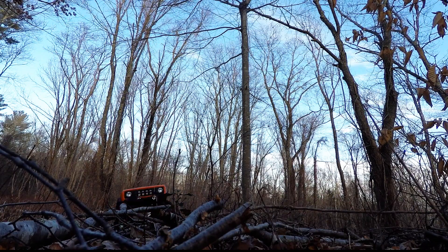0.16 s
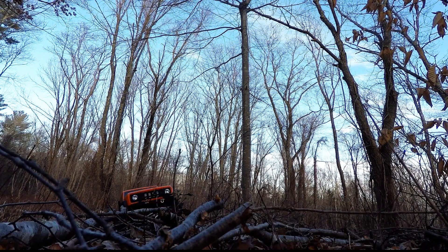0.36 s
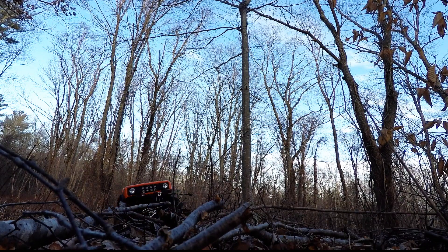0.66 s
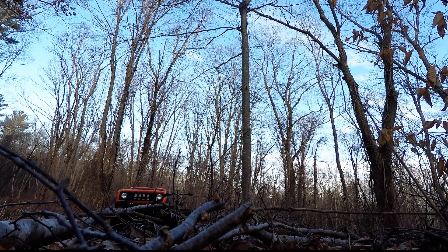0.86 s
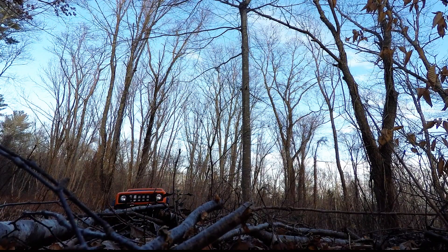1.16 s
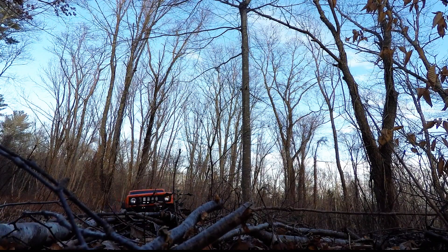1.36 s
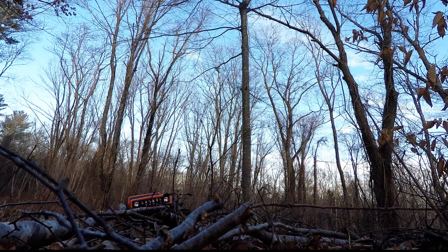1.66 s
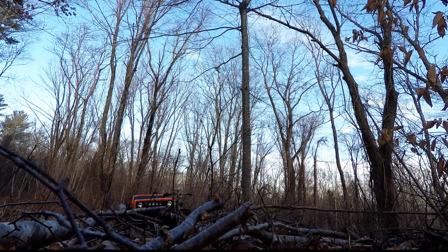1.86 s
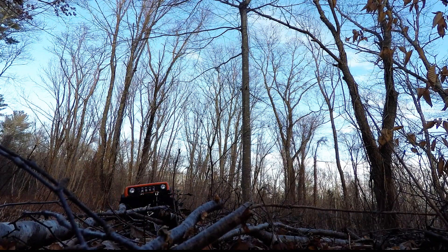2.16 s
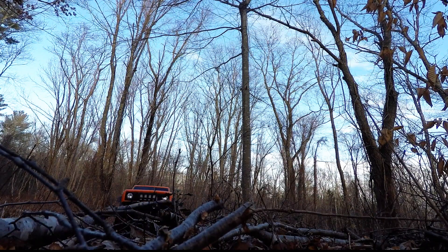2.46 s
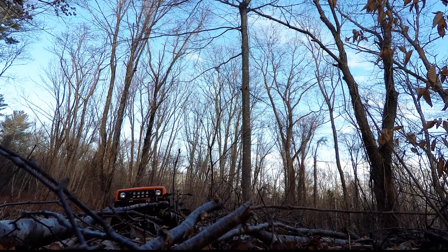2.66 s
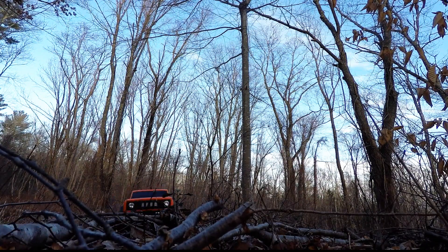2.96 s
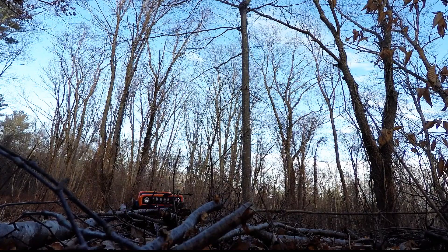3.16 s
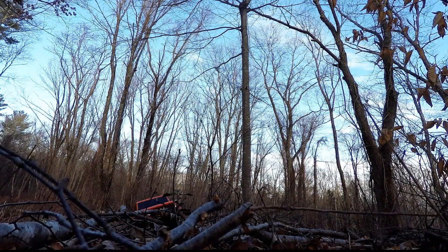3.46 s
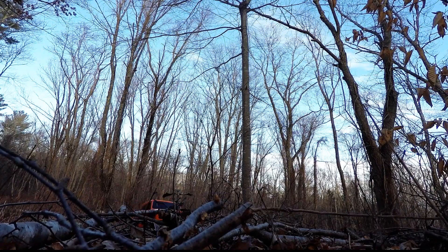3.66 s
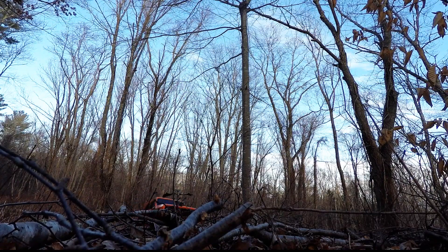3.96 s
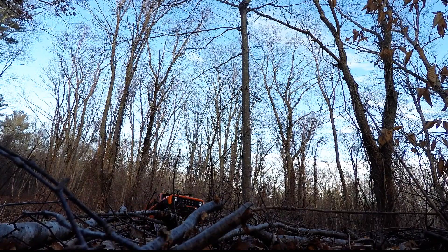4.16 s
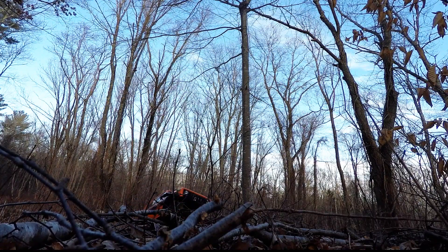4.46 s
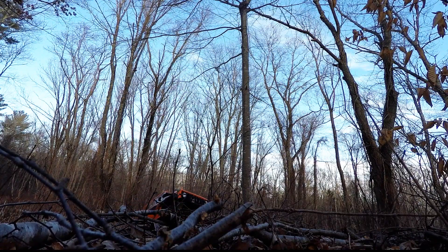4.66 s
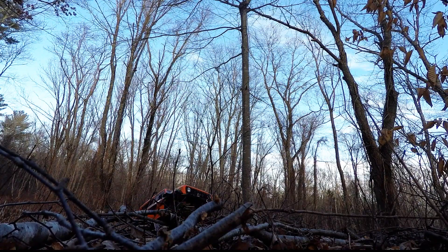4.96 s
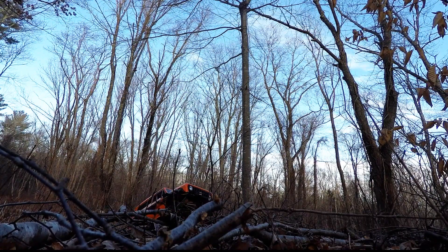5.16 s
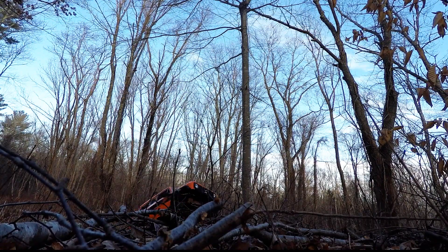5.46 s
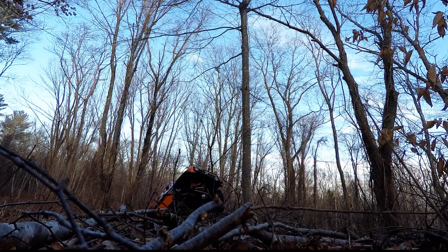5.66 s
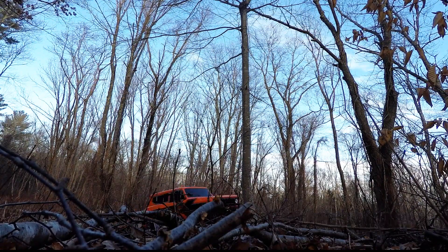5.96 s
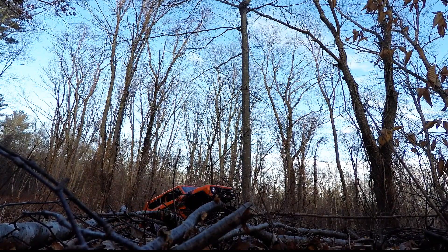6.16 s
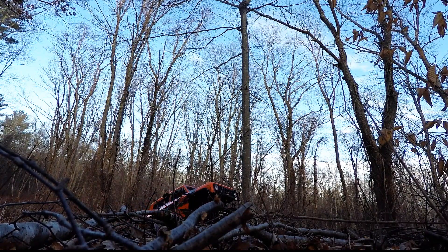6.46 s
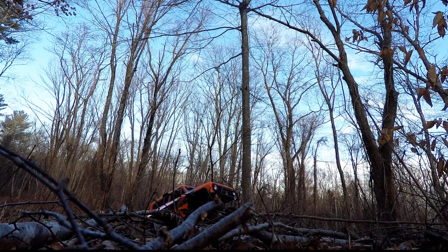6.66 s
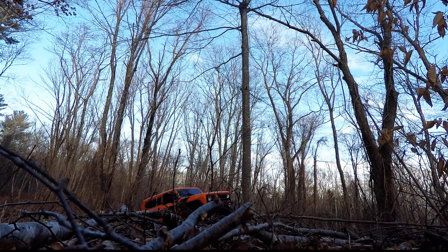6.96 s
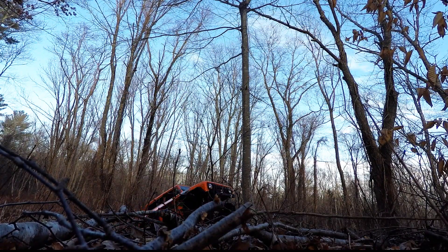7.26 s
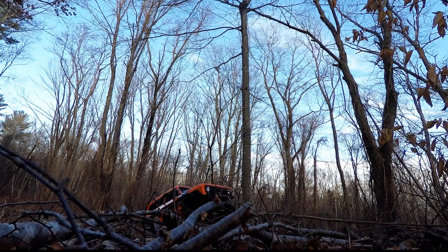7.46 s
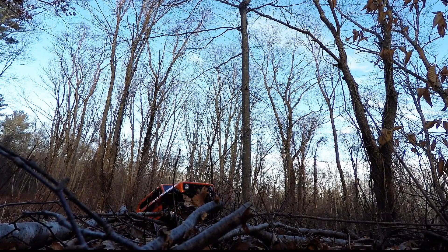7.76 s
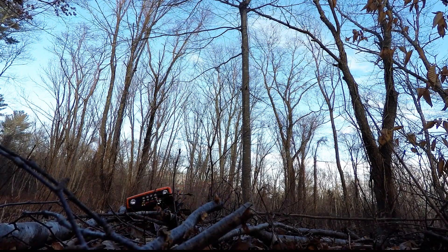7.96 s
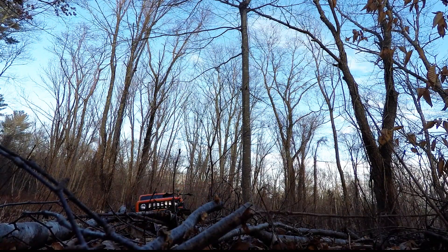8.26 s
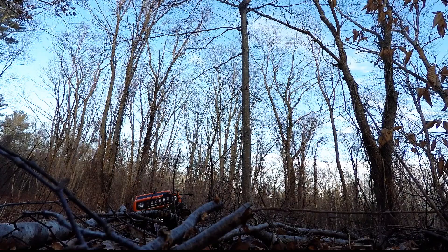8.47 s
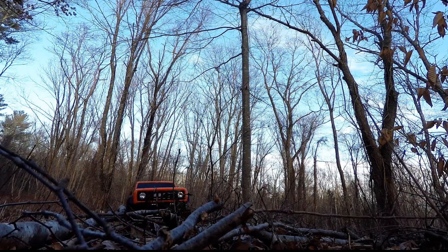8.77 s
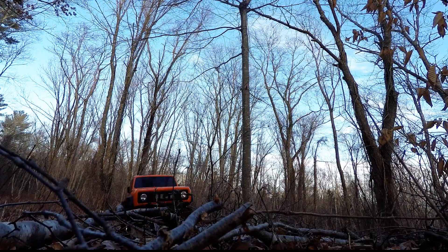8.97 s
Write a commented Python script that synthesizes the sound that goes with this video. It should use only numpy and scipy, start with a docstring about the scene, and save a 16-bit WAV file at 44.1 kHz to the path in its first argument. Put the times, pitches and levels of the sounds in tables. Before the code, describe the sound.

Stop-start whirring and gritty gear clatter come from a radio-controlled toy truck working across a woodland branch pile. Sticks knock, dry leaves crackle and twigs crack, most sharply about three seconds in. A longer straining whine follows, then further brief pulls with hollow bumps as the wheels drop, ending in a leafy crunch and snap. The sound is fairly close, with very little echo and faint low outdoor air.

```python
"""A small radio-controlled truck crawls over dead branches and dry leaves in a wood.
It sets off in short throttle pulls: gears whine and rasp, the chassis rumbles, tyres scrub bark and
crush leaves, the steering servo buzzes. Twigs snap and sticks knock, loudest near 3 s. From 3.8 s the
motor labours through a long climb; short pulls follow, with a hard double bump at 7.7 s. A last climb
ends at 9 s in crushed leaves, a bump and a snap. Outdoor air rumbles faintly throughout."""
import sys
import numpy as np
from scipy import signal
from scipy.fft import rfft, irfft, next_fast_len
from scipy.io import wavfile
from scipy.ndimage import uniform_filter1d, map_coordinates

SR = 44100
rng = np.random.default_rng(int(sys.argv[2]) if len(sys.argv) > 2 else 0)


def inscribe(sig):
    """Save sig as 16-bit PCM at rate SR to the path in sys.argv[1].

    A 1-D sig is mono; a 2-D sig holds one channel per row.
    Samples are clipped to [-1, 1] before scaling.
    """
    pcm = np.round(np.clip(np.atleast_2d(sig).T, -1, 1) * 32767)
    wavfile.write(sys.argv[1], SR, pcm.astype(np.int16))


N = 401310
TIME_S = np.arange(N) / SR

# Throttle pulls: (start [s], stop [s], rasp [dB], rasp change [dB], whine [dB], full-speed mesh [Hz],
# shake [dB], scrub [dB], shake and scrub change [dB], crackle [dB], crackle change [dB])
THROTTLE_PULLS = [(-.06, 0.285, -50.5, 21, -58, 1854, -40, -52.5, -8, -62, -4),
                  (0.586, 0.902, -41.5, -12, -60, 2396, -37, -44.5, -0.5, -54, 9),
                  (1.209, 1.495, -41.5, 2, -52, 2327, -34, -40.5, 5.5, -55.5, -3),
                  (1.90, 2.39, -45.5, 10, -73, 2200, -43, -58, 8, -67.5, 22),
                  (2.346, 2.691, -46.5, 5, -70, 2308, -38.5, -46.5, -1.5, -52, 3.5),
                  (2.859, 3.377, -38.5, 1, -57, 2214, -32.5, -44, 2.5, -55.5, -9.5),
                  (3.827, 4.613, -47.5, 12, -58, 1792, -42.5, -58.5, 6.5, -64.5, -2),
                  (4.529, 5.64, -40, 3, -49.5, 2303, -38, -59.5, 7.5, -63, -1),
                  (5.571, 5.899, -36.5, 2, -49, 2300, -38, -51.5, 7.5, -56, -3),
                  (6.134, 6.531, -38.5, -3, -67, 2292, -35, -48.5, 1.5, -59, -6),
                  (6.79, 7.045, -41.5, 2, -61, 2195, -36, -44, 9, -63.5, 7),
                  (7.105, 7.478, -35.5, 1, -56, 2195, -31.5, -43, 3, -53.5, 2),
                  (7.555, 7.924, -36, -2.5, -52, 2387, -29.5, -40.5, 0, -55, 3),
                  (8.398, 8.764, -44, -2.5, -57, 2400, -39.5, -51.5, 5, -62, 16),
                  (8.732, 9.10, -47, 3, -60, 2294, -44.5, -55, 16, -66, 34)]
# Whine pitch curves, a brief servo-like arch near 1.85 s, then the climbs: (time [s], tooth mesh [Hz])
PITCH_CURVES = [
    [(1.8, 1384), (1.85, 1540), (1.89, 1380), (1.93, 688), (2.1, 1433), (2.2, 1903), (2.28, 1890),
     (2.35, 2210)],
    [(3.84, 1884), (3.95, 1668), (4.03, 1823), (4.3, 1674), (4.4, 2137), (4.47, 1657), (4.7, 2442),
     (4.85, 2568), (4.97, 2112), (5.09, 2428), (5.15, 2030), (5.28, 2574), (5.33, 2278), (5.38, 2265),
     (5.48, 1880), (5.53, 1870), (5.58, 2294), (5.67, 2390)],
    [(8.41, 1750), (8.51, 1850), (8.55, 2263), (8.65, 2503), (8.8, 1824), (8.95, 1860), (9.0, 2250)],
]


def gear_speed():
    """Tooth mesh in Hz: each pull spins the motor up; the pitch curves override it over their spans."""
    crawl_hz, spin_up_s = 1785.5, .08
    mesh_hz = np.zeros(N)
    for start, _, _, _, _, full_hz, *_ in THROTTLE_PULLS:
        on = TIME_S >= start
        spin_up = np.clip((TIME_S[on] - start) / spin_up_s, 0, 1) ** 2
        mesh_hz[on] = crawl_hz + (full_hz - crawl_hz) * spin_up
    for curve in PITCH_CURVES:
        times_s, curve_hz = np.transpose(curve)
        on = (TIME_S >= times_s[0]) & (TIME_S <= times_s[-1])
        mesh_hz[on] = np.interp(TIME_S[on], times_s, curve_hz)
    return mesh_hz


# Tooth-mesh harmonics: (multiple, level [dB], labouring boost [dB])
MESH_HARMONICS = [(1, -22, 19), (2, 10.5, -1.5), (3, -7, 7), (4, -16, 8)]
# Gear housing resonances: (centre [Hz], width [Hz], gain [dB])
HOUSING_MODES = [(1685, 71, -4), (2186, 71, 2), (2795, 280, -6), (3290, 67, 4), (3676, 110, 4.5),
                 (3984, 124, 0), (4392, 64, 8.5), (4730, 73, 8), (5140, 394, 2.5), (6010, 470, -1.5),
                 (6580, 312, -1), (7740, 304, -4.5), (10440, 1000, -17.5), (11460, 650, -11)]
# Short swells of whine: (centre time [s], length [s], level [dB])
WHINE_SWELLS = [(0.624, 0.046, -47), (0.697, .07, -44.5), (1.846, .07, -57.5), (2.11, .1, -53),
                (2.266, 0.14, -52), (2.948, .08, -50), (3.112, .07, -41), (4.04, .05, -57),
                (4.301, 0.078, -50), (4.462, 0.074, -46.5), (5.075, 0.049, -46), (5.151, 0.025, -50),
                (5.282, 0.045, -51), (5.494, 0.072, -43.5), (5.655, 0.034, -37), (6.177, 0.024, -52),
                (7.595, 0.041, -45), (8.48, 0.048, -52), (8.58, 0.08, -44.5)]


def gear_whine(mesh_hz):
    """Meshing teeth give a fluttering whine through the housing, with stronger sidebands when racing."""
    racing = np.clip((mesh_hz - 1850) / 550, 0, 1)
    flutter = 1 + .01 * wobble(70) + (.019 + .002 * racing) * wobble(900)
    phase = 2 * np.pi * np.cumsum(mesh_hz * flutter) / SR
    pinion_phase = phase / 11
    tone = np.zeros(N)
    for multiple, db, labour_db in MESH_HARMONICS:
        uneven_teeth = 1 + (.45 + .45 * racing) * np.sin(pinion_phase + 1.5 * wobble(40))  # sidebands
        harmonic_db = db + labour_db * (1.5 - racing) + 3.35 * wobble(110)
        tone += amp(harmonic_db) * uneven_teeth * np.sin(multiple * phase)
    tone = filtered(tone, lambda f: .5 + np.abs(resonances(HOUSING_MODES, f)))
    tone /= np.sqrt(np.abs(uniform_filter1d(tone ** 2, size=3000)) + 1e-12)  # running rms 1
    pulls = [(start, stop, db, change / 2) for start, stop, _, change, db, *_ in THROTTLE_PULLS]
    throttle = swells(pulls, attack_s=.045, arch_db=-.5, release_db_per_s=252, idle_db=-91)
    swell_power = sum(amp(db) ** 2 * np.exp(-np.minimum((2 * (TIME_S - s) / length_s) ** 2, 20))
                      for s, length_s, db in WHINE_SWELLS)
    load_db = 2.2 * wobble(45)
    return np.sqrt(throttle ** 2 + swell_power) * amp(load_db) * tone


# Tooth clatter spectrum: (frequency [Hz], gain [dB])
RASP_SPECTRUM = [(300, -40), (1200, 1.5), (1800, 0.5), (7800, -0.5), (8800, 19), (11000, -9), (15000, -12)]


def gear_rasp(mesh_hz):
    """Teeth clatter in the housing, harder once per turn of the spur gear."""
    spur_phase = 2 * np.pi * np.cumsum(mesh_hz / 38) / SR
    clatter = contacts(rate_hz=8300, spread_db=2.5) * amp(1.2 * np.sin(spur_phase) + 2.23 * wobble(130))
    rasp = filtered(clatter, lambda f: resonances(HOUSING_MODES, f) * amp(along(RASP_SPECTRUM, f)))
    pulls = [pull[:4] for pull in THROTTLE_PULLS]
    throttle = swells(pulls, attack_s=.052, arch_db=4, release_db_per_s=228, idle_db=-58.5)
    return amp(-5) * throttle * unit(rasp)


# Hollow body resonances: (centre [Hz], width [Hz], gain [dB])
CHASSIS_MODES = [(83.3, 23, -2), (161.6, 40, -3.5), (261, 123, -5), (359, 71, -1), (438.3, 61.6, 2),
                 (505, 110, -2), (770, 250, -12.5), (1134, 38, -13.5)]
# Body damping: (frequency [Hz], gain [dB])
CHASSIS_SPECTRUM = [(25, -23), (60, 2.5), (520, -0.5), (640, -6.5), (1150, -11), (1600, -39), (3000, -44),
                    (6000, -80)]
# Sliding and settling, throttle off: (start [s], stop [s], shake [dB], crackle [dB])
IDLE_SLIDES = [(0.313, 0.43, -38.5, -82), (1.593, 1.678, -43.5, -70), (2.768, 2.843, -46.5, -66),
               (3.484, 3.55, -39, -61.5), (5.919, 5.996, -36.5, -57.5), (7.958, 8.035, -41.5, -62),
               (8.132, 8.279, -45, -73)]


def chassis(mesh_hz):
    """Tyre lugs and the drive shaft shake the body, which also rattles briefly after each bump."""
    lugs = contacts(rate_hz=1600, spread_db=3) * amp(wobble(30))
    shaft = ticks(mesh_hz / 18 * (1 + .03 * wobble(60))) * amp(-14 + 6.1 * wobble(5))
    body = filtered(lugs + shaft, lambda f: resonances(CHASSIS_MODES, f) * amp(along(CHASSIS_SPECTRUM, f)))
    pulls = [(start, stop, db, change) for start, stop, *_, db, _, change, _, _ in THROTTLE_PULLS]
    slides = [(start, stop, db, 0) for start, stop, db, _ in IDLE_SLIDES]
    jolts = [(s, s + .046, db - 16, 0) for s, db, _ in WHEEL_DROPS]
    shake = swells(pulls + slides, attack_s=.069, arch_db=2, release_db_per_s=114, idle_db=-60.5)
    rattle = swells(jolts, attack_s=.0043, arch_db=0, release_db_per_s=260, idle_db=-120)
    return np.hypot(shake, rattle) * unit(body)


# Wheels landing on branches: (time [s], level [dB], favoured ring [Hz])
WHEEL_DROPS = [(0.412, -27, 293), (.565, -30, 120), (0.766, -19.5, 165), (0.823, -18.5, 130),
               (1.304, -22, 425), (1.42, -26.5, 434), (1.49, -17.5, 430), (1.926, -31, 380),
               (2.384, -17.5, 288), (3.043, -16, 397), (3.088, -16, 164.4), (5.335, -23.5, 270),
               (6.463, -21.5, 430), (7.724, -14.5, 425), (7.751, -15, 430), (9.079, -14.5, 299.6)]


def bumps():
    """A dropping wheel thumps the chassis; where it lands sets which modes ring most."""
    track = np.zeros(N)
    for s, db, ring_hz in WHEEL_DROPS:
        modes = [(hz, mode_db - 11 * abs(np.log2(hz / ring_hz)), 1.9 * np.log(1000) / (np.pi * width_hz))
                 for hz, width_hz, mode_db in CHASSIS_MODES]
        add(track, s, amp(db - 2.5) * blow(modes, attack_s=.0037))
    return track


# Steering moves: (start [s], stop [s], level [dB])
SERVO_MOVES = [(1.06, 1.24, -62), (1.783, 2.038, -56.5), (2.743, 2.886, -57.5), (6.657, 6.79, -62),
               (7.969, 8.03, -50)]
# Servo case resonances: (centre [Hz], width [Hz], gain [dB])
SERVO_MODES = [(2900, 250, 5), (4800, 300, 9), (5500, 340, 9), (6000, 280, 3), (6670, 180, 9),
               (7930, 350, 5.5), (8340, 250, 1)]


def servo():
    """The steering servo's tiny gears buzz in their case in short spurts."""
    mesh_hz, ramp_s = 760, .019
    teeth = ticks(mesh_hz * (1 + .058 * wobble(9.8) + .012 * wobble(200)))
    buzz = filtered(teeth + .76 * rng.standard_normal(N), lambda f: resonances(SERVO_MODES, f) * (f > 2000))
    gate = sum(amp(db) * np.clip(np.minimum(TIME_S - start, stop - TIME_S) / ramp_s, 0, 1)
               for start, stop, db in SERVO_MOVES)
    return gate * unit(buzz)


# Rubber on bark: (frequency [Hz], gain [dB])
SCRUB_SPECTRUM = [(300, 7), (760, 4), (1000, -8), (1550, -14), (1950, -9), (2200, -5), (2450, -1.5),
                  (2750, 2), (3500, -7), (5500, -5.5), (7500, -15.5), (9000, -24.5), (15000, -27.5)]


def tyres():
    """Rubber catches and slips on rough bark during pulls and slides."""
    slips = contacts(rate_hz=4000, spread_db=3.5) * amp(4 * wobble(90))
    pulls = [(start, stop, db, change) for start, stop, *_, db, change, _, _ in THROTTLE_PULLS]
    slides = [(start, stop, shake_db - 18.5, 0) for start, stop, shake_db, _ in IDLE_SLIDES]
    motion = swells(pulls + slides, attack_s=.088, arch_db=4, release_db_per_s=179, idle_db=-69.5)
    return amp(2.5) * motion * coloured(slips, SCRUB_SPECTRUM)


# Crushed dry leaves: (frequency [Hz], gain [dB])
LEAF_SPECTRUM = [(500, -11), (950, 6), (1400, 9), (2000, 12.5), (2600, 7.5), (6000, 8.5), (8000, 0),
                 (9200, -5), (11000, -5.5), (13000, -3.5), (15500, -12)]


def leaves():
    """Dry leaves break under the wheels in clumps of tiny, fast-dying cracks."""
    t, t60_s = np.arange(SR // 25) / SR, .026
    cracks = contacts(rate_hz=900, spread_db=4) * amp(1.2 * wobble(55))
    energy = signal.fftconvolve(cracks ** 2, amp(-60 * t / t60_s) ** 2)[:N]
    crackle = np.sqrt(np.abs(energy)) * rng.standard_normal(N)
    pulls = [(start, stop, db, change) for start, stop, *_, db, change in THROTTLE_PULLS]
    slides = [(start, stop, db, 0) for start, stop, _, db in IDLE_SLIDES]
    motion = swells(pulls + slides, attack_s=.058, arch_db=4.5, release_db_per_s=202, idle_db=-76.5)
    return amp(8.5) * motion * coloured(crackle, LEAF_SPECTRUM)


# Breaking twigs: (time [s], peak [dB], resonance [Hz], width [Hz])
TWIG_SNAPS = [(0.152, -32, 2450, 1490), (.2054, -31.5, 4110, 3000), (.3934, -28, 5230, 6000),
              (0.506, -38.5, 2720, 296), (0.894, -35, 2760, 3000), (.946, -33.5, 2460, 3040),
              (1.0015, -40, 1650, 180), (1.002, -39, 2500, 200), (1.305, -25, 3670, 4000),
              (1.3605, -26, 5000, 9000), (1.5174, -28.5, 3657, 3000), (1.579, -41, 1490, 3080),
              (1.6351, -47, 5510, 3970), (1.921, -37.5, 1970, 3000), (2.43, -29, 5000, 6000),
              (2.518, -22.5, 2470, 8000), (2.703, -28.5, 2710, 3970), (3.033, -25, 5040, 3000),
              (3.061, -16.5, 4590, 4045), (3.066, -21.5, 1390, 1210), (3.198, -24, 3770, 598),
              (3.481, -40, 5527, 5030), (3.524, -38.5, 3313, 2980), (6.889, -37, 2660, 2500),
              (7.7624, -30, 4767, 6187), (8.402, -54, 3562, 3005), (9.076, -23.5, 2600, 2510)]
# Colour common to all twigs: (frequency [Hz], gain [dB])
TWIG_SPECTRUM = [(200, 13), (800, -14), (1300, 8), (2400, 4.5), (6500, 6), (9000, -6.5), (15000, 1)]


def twigs():
    """Each twig gives a short crack and a splintering tail, coloured by one resonance."""
    track, t = np.zeros(N), np.arange(SR // 12) / SR
    crack_t60_s, tail_t60_s = .024, .08
    decay = amp(-60 * t / crack_t60_s) + amp(-20 - 60 * t / tail_t60_s)
    for s, db, hz, width_hz in TWIG_SNAPS:
        burst = rng.standard_normal(len(t)) * decay
        crack = filtered(burst, lambda f: resonances([(hz, width_hz, 0)], f) * amp(along(TWIG_SPECTRUM, f)))
        add(track, s, amp(db) * crack / np.abs(crack).max())
    return track


# Sticks hitting the truck: (time [s], level [dB])
STICK_KNOCKS = [(0.148, -31.5), (1.302, -27), (1.359, -32), (1.479, -33), (1.578, -42), (1.921, -40.5),
                (3.062, -24.5), (3.21, -31.5), (3.363, -35.5), (3.414, -35.5), (5.65, -34.5), (6.9, -35.5),
                (7.757, -40)]
# Dead stick modes: (frequency [Hz], level [dB], t60 [s])
STICK_MODES = [(430, -1, .07), (810, 0, .06), (920, -4, .05), (1640, -20, .04), (2480, -16, .04)]


def sticks():
    """Dead sticks knock against the truck and ring briefly."""
    track = np.zeros(N)
    for s, db in STICK_KNOCKS:
        add(track, s, amp(db + 2) * blow(STICK_MODES, attack_s=.0005))
    return track


# Echo decay among trunks: (frequency [Hz], t60 [s])
ECHO_DECAY = [(200, 0.17), (2000, 0.16), (12000, 0.041)]


def woodland_echo(x):
    """Trunks scatter a short echo whose treble dies first."""
    hz, t, noise = signal.stft(rng.standard_normal(SR // 2), SR, nperseg=256)
    decay = amp(-60 * t / along(ECHO_DECAY, hz)[:, None])
    tail = signal.istft(noise * decay, SR, nperseg=256)[1]
    return signal.fftconvolve(x, tail / np.linalg.norm(tail))[:N]


# Outdoor air: (frequency [Hz], gain [dB])
AIR_SPECTRUM = [(10, -52), (20, -10.5), (28, 1.5), (42, -7.5), (70, -13.5), (150, -26), (450, -33.5),
                (700, -39.5), (1500, -49.5), (5000, -56), (9000, -56), (15000, -60)]


def air():
    """Low outdoor rumble with a deep wavering hum and a trace of hiss."""
    hum_hz = 28 + 1.474 * wobble(5.2)
    hum = np.sin(2 * np.pi * np.cumsum(hum_hz) / SR)
    rumble_db = -43.5 + wobble(2.06)
    return amp(-49) * hum + amp(rumble_db) * coloured(rng.standard_normal(N), AIR_SPECTRUM)


def swells(rows, attack_s, arch_db, release_db_per_s, idle_db):
    """Gain from (start [s], stop [s], level [dB], change [dB]) rows; each sags by arch_db at its ends."""
    power = np.full(N, amp(idle_db) ** 2)
    for start, stop, db, change_db in rows:
        on = (TIME_S > start) & (TIME_S < stop + 1)
        t = TIME_S[on]
        attack = np.clip((t - start) / attack_s, 0, 1)
        from_middle = np.clip((t - start) / (stop - start), 0, 1) - .5
        hold_db = db + change_db * from_middle - arch_db * (2 * from_middle) ** 2
        release_db = release_db_per_s * np.maximum(t - stop, 0)
        power[on] += (attack * amp(hold_db - release_db)) ** 2
    return np.sqrt(power)


def blow(modes, attack_s):
    """One strike on (frequency [Hz], level [dB], t60 [s]) modes, each varied at random; peak 1."""
    t = np.arange(SR // 4) / SR
    ring = np.zeros(len(t))
    for hz, db, t60_s in modes:
        strength, detune = rng.standard_normal(2)
        ring += amp(db + 2 * strength - 60 * t / t60_s) * np.sin(2 * np.pi * hz * (1 + .03 * detune) * t)
    ring *= 1 - np.exp(-t / attack_s)
    return ring / np.abs(ring).max()


def contacts(rate_hz, spread_db):
    """Tiny impacts at random times with log-normal sizes; rms 1."""
    hits = rng.random(N) < rate_hz / SR
    size_db = spread_db * np.clip(rng.standard_normal(N), -3, 2.3)
    return unit(hits * amp(size_db) * rng.choice([-1, 1], N))


def ticks(rate_hz):
    """One impulse per cycle; rms 1."""
    return unit(np.diff(np.floor(np.cumsum(rate_hz) / SR), prepend=0))


def wobble(rate_hz):
    """Smooth random curve with rate_hz knots per second."""
    knots = rng.standard_normal(int(N * rate_hz / SR) + 4)
    return map_coordinates(knots, [TIME_S * rate_hz])


def resonances(modes, f):
    """Causal response of (centre [Hz], width [Hz], gain [dB]) modes, alternating in sign."""
    return sum((-1) ** k * amp(db) * 1j * f * width / (hz * hz - f * f + 1j * f * width)
               for k, (hz, width, db) in enumerate(modes))


def filtered(x, response):
    """Apply a complex frequency response."""
    size = next_fast_len(len(x) + 8192)
    return irfft(rfft(x, size) * response(np.fft.rfftfreq(size, 1 / SR)), size)[:len(x)]


def coloured(x, spectrum):
    """Shape by (frequency [Hz], gain [dB]) points; rms 1."""
    return unit(filtered(x, lambda f: amp(along(spectrum, f))))


def along(points, hz):
    """Read (frequency [Hz], value) points on a log axis."""
    point_hz, values = np.transpose(points)
    return np.interp(np.log(hz + 1), np.log(point_hz + 1), values)


def amp(db):
    """Decibels to gain."""
    return 10 ** (np.asarray(db) / 20)


def unit(x):
    """Scale to rms 1."""
    return x / np.sqrt(np.mean(x ** 2) + 1e-20)


def add(track, start_s, sound):
    """Mix a sound into the track."""
    part = track[round(start_s * SR):][:len(sound)]
    part += sound[:len(part)]


def scene():
    """The truck and what it runs over, among the trees; mono."""
    mesh_hz = gear_speed()
    truck = chassis(mesh_hz) + bumps() + gear_whine(mesh_hz) + gear_rasp(mesh_hz) + servo()
    near = truck + sticks() + tyres() + leaves() + twigs()
    return (near + amp(-17.5) * woodland_echo(near) + air())[None]


def record(dry):
    """Steep low-pass."""
    cutoff_hz = 15400
    return np.array([filtered(x, lambda f: 1 / (1 + (f / cutoff_hz) ** 200)) for x in dry])


dry = scene()
out = record(dry)
inscribe(out)
```